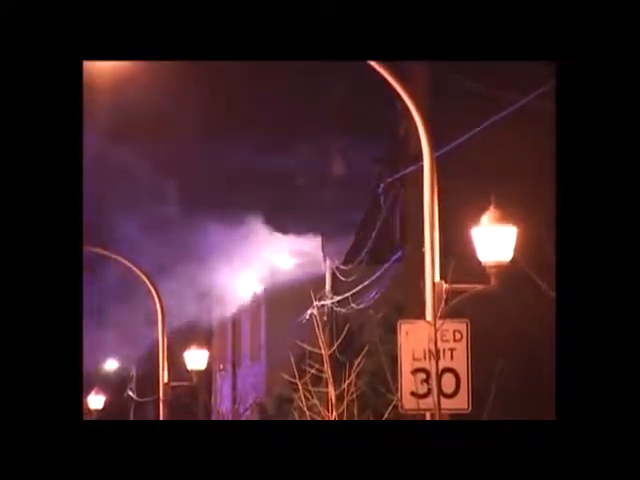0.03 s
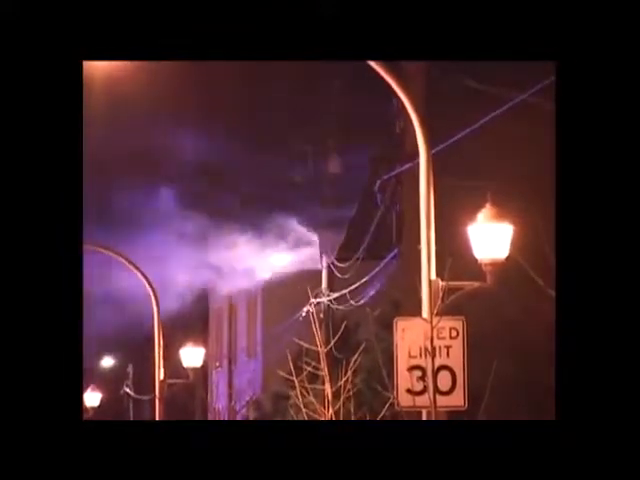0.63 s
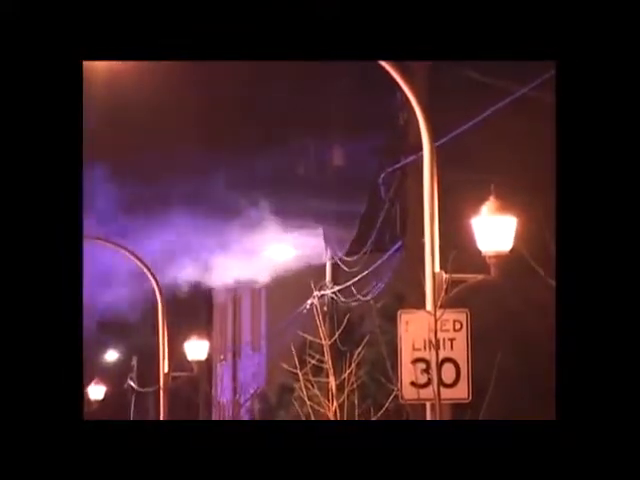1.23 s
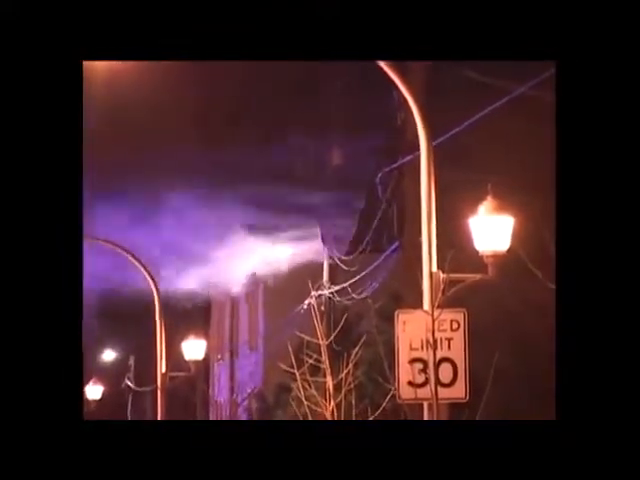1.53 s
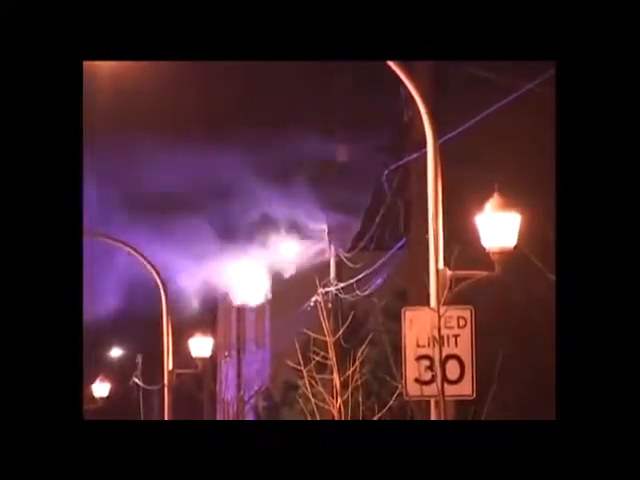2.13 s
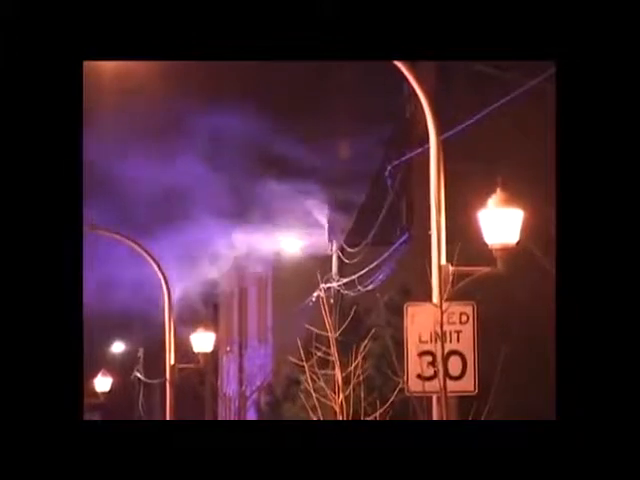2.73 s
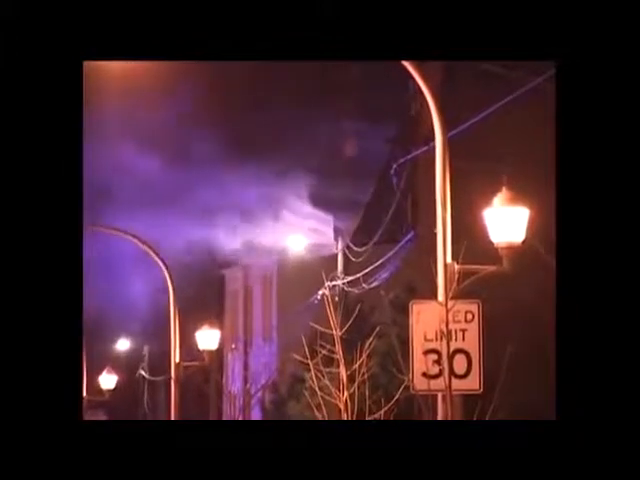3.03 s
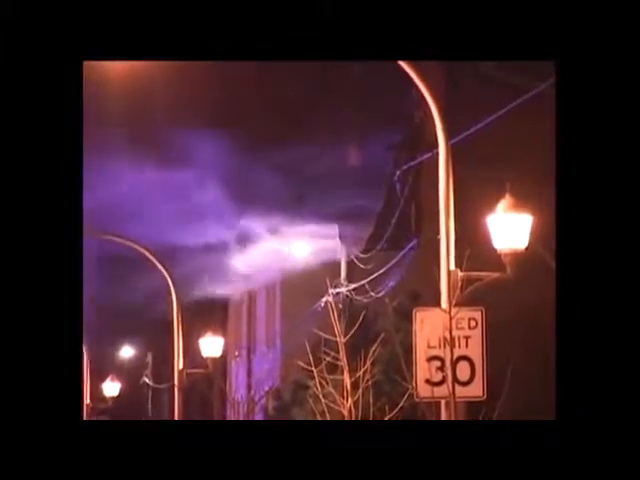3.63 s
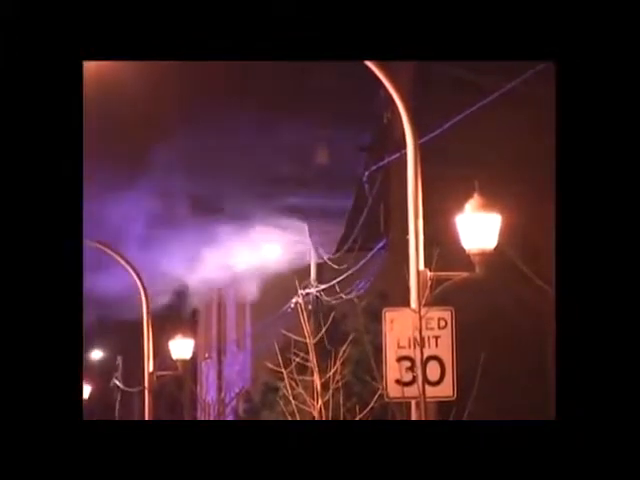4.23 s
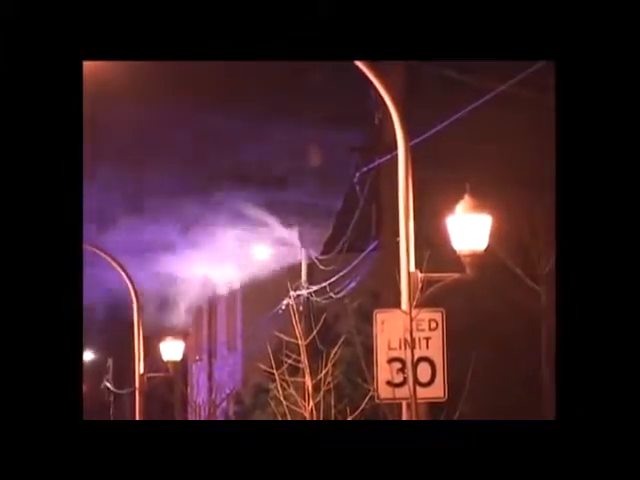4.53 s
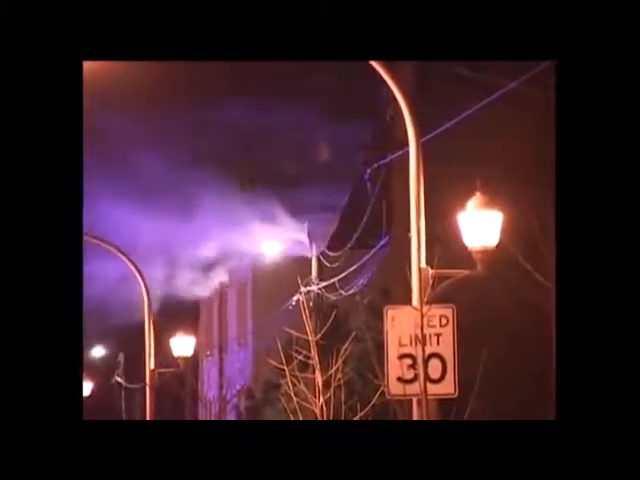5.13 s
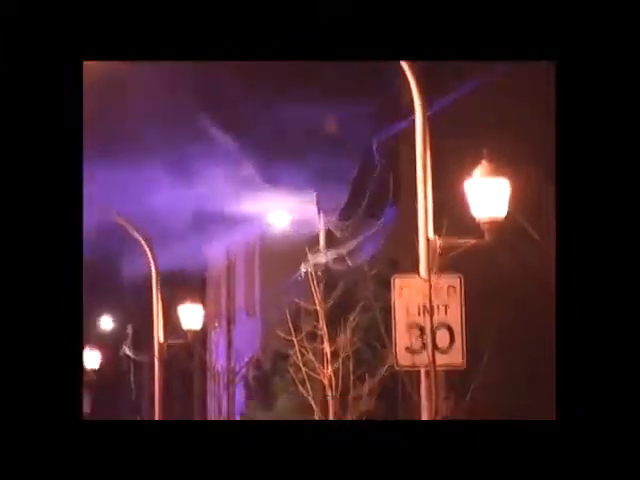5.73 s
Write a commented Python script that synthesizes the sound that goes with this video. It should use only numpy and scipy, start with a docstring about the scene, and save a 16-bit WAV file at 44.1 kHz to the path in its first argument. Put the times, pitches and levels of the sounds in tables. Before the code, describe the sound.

Gusty wind rumbles on the microphone over the continuous roar, thin hiss and small snaps of a distant electrical arc.

```python
"""A power line arcs at night, far down a windy street: steady roar and rasp, thin hiss.
Its sparks add a fine fizz and millisecond crackles. Short sizzles pass; a brief bright hiss comes last.
Wind eddies hit the microphone in single puffs, drop to a lull, then buffet it in long gusts.
In the lull a low hum swells, climbs in pitch and fades. One microphone feeds both channels."""
import sys
import numpy as np
from scipy import signal
from scipy.fft import rfft, irfft, next_fast_len
from scipy.io import wavfile
from scipy.ndimage import uniform_filter1d, map_coordinates

SR = 44100
rng = np.random.default_rng(int(sys.argv[2]) if len(sys.argv) > 2 else 0)


def put_to_file(sound):
    """Save the sound as 16-bit audio at rate SR, in the file named by the first command-line argument."""
    columns = np.atleast_2d(sound).T  # one column per channel
    safe = np.clip(columns, -1, 1)
    whole_steps = np.round(safe * 32767)
    wavfile.write(sys.argv[1], SR, whole_steps.astype(np.int16))


N = 264600

# arc envelopes, before layer offsets: (time [s], strength [dB], rasp [dB])
ARC_LEVELS = [(0.0, -42, -42), (0.22, -41, -38), (0.9, -42, -44), (2.2, -42, -42.5), (2.72, -42.5, -42),
              (3.15, -40.5, -41.5), (4.05, -40.5, -39.5), (4.9, -41, -42), (5.95, -42, -41.5)]
# loudest snaps: (time [s], level [dB], centre [Hz])
CRACKLE_EVENTS = [(0.4835, -36.5, 4730), (0.7713, -36, 6800), (.9522, -36, 5600), (1.1495, -35, 4600),
                  (1.6747, -30, 4430), (1.8551, -37, 5000), (2.491, -36, 3900), (2.598, -38, 4900),
                  (2.8414, -37, 6500), (3.4591, -34, 3600), (4.1812, -31, 5000), (4.421, -32, 4100),
                  (4.4778, -36, 6000), (4.702, -30, 3400), (4.8336, -35, 6300), (4.862, -26.5, 3600),
                  (5.127, -30.5, 4200)]
# short sizzles, then a brief bright hiss at the very end: (time [s], level [dB], half length [s])
SIZZLE_EVENTS = [(1.753, -43, 0.01), (1.779, -43, 0.012), (3.487, -53.5, 0.019), (4.204, -43, 0.008),
                 (4.873, -51, 0.03), (5.655, -52, 0.012), (5.983, -43.5, 0.013)]
# noise spectra: (frequency [Hz], relative density [dB])
ROAR_SPECTRUM = [(15, -45), (40, -27), (90, -20), (200, -1.5), (350, -7.5), (550, -6), (700, -4),
                 (880, -1.5), (1100, -6), (1600, -10.5), (2100, -16.5), (3200, -28.5), (5000, -37),
                 (12000, -59)]
RASP_SPECTRUM = [(600, -38), (1100, -2.5), (1450, -1), (1950, -4), (2600, -10.5), (3300, -22), (6000, -41),
                 (12000, -68)]
HISS_SPECTRUM = [(1500, -1.5), (3200, -1), (4400, 3.5), (6000, -1.5), (8000, -5.5), (10000, -8.5),
                 (12000, -19.5)]
FIZZ_SPECTRUM = [(1000, -37), (3000, 2.5), (4500, 2), (7500, -4), (12000, -13)]
SIZZLE_SPECTRUM = [(2000, -8), (4000, 5), (7500, 5), (9500, 0), (12000, -5.5)]
# wind at the microphone: (time [s], strength [dB])
WIND_LEVELS = [(0, -34.5), (0.25, -27), (0.72, -33.5), (1.02, -30.5), (1.25, -42), (1.66, -37), (2.1, -45),
               (2.73, -36.5), (2.83, -23.5), (2.94, -19.5), (3.01, -25.5), (3.22, -18), (3.45, -22.5),
               (3.63, -17), (3.92, -24.5), (4.06, -32), (4.25, -31), (4.36, -20.5), (4.57, -25),
               (4.87, -15.5), (5.07, -25), (5.6, -18.5), (5.73, -27.5), (5.8, -18.5), (5.93, -13.5),
               (5.99, -55)]
# small eddies: (time [s], level re wind strength [dB])
EDDY_LEVELS = [(0.3, -9), (3.2, -6.5), (4.3, -12.5), (5.1, -8.5), (5.9, -10.5)]
# lone eddies: (time [s], relative level [dB], pitch [Hz])
PUFF_EVENTS = [(0.212, -14.5, 122), (0.249, -19.5, 85.6), (0.4383, -8, 146), (0.505, -20.5, 173),
               (0.649, -15, 135), (.940, -19, 106), (1.590, -17.5, 100), (1.892, -28.5, 112),
               (3.785, -9.5, 99), (4.372, -17.5, 128), (4.876, -11.5, 150), (5.385, -14, 175),
               (5.539, -9, 149), (5.914, -7.5, 187), (5.959, -8.5, 180)]
# turbulence spectra: (frequency [Hz], relative density [dB])
BUFFET_SPECTRUM = [(8, -50), (22, -19), (38, -20), (55, -9.5), (80, 3), (130, 1.5), (190, -5.5), (260, -15),
                   (400, -30.5), (800, -70), (4000, -120)]
EDDY_SPECTRUM = [(20, -72), (90, -34), (170, -1.5), (235, 1), (310, -3), (420, -11), (650, -22),
                 (1200, -39.5), (3000, -42), (10000, -120)]
WAKE_SPECTRUM = [(40, -30), (150, -10), (240, -5.5), (380, -7.5), (520, -15), (800, -38), (3000, -80)]


def arc():
    """Arc roar and rasp arrive through gusty air; a thin hiss follows the roar."""
    strength_db, rasp_db = curves(ARC_LEVELS)
    roar = amp(strength_db + 3.5) * patchy(noise(ROAR_SPECTRUM), depth_db=0.2)
    rasp = amp(rasp_db - 2 + 1.1 * wobble(120)) * patchy(noise(RASP_SPECTRUM), depth_db=1.35)
    hiss = amp(strength_db - 13.5 + 0.31 * wobble(24.2)) * noise(HISS_SPECTRUM)
    return roar + rasp + hiss


def fizz():
    """Tiny sparks flare briefly, in clumps; their level follows the arc."""
    strength_db, _ = curves(ARC_LEVELS)
    rate_per_s, energy_decay_s = 170 * amp(2.2 * wobble(18)), 0.003
    fires = rng.random(N) < rate_per_s / SR
    sparks = fires * amp(np.minimum(5.3 * rng.exponential(size=N), 11))
    decay = np.exp(-np.arange(SR // 50) / SR / energy_decay_s)
    flare = np.sqrt(np.abs(signal.fftconvolve(sparks ** 2, decay)[:N]))
    bursts = coloured(flare * rng.standard_normal(N), FIZZ_SPECTRUM)
    return amp(strength_db - 14) * patchy(bursts, depth_db=2.0)


def crackles():
    """Millisecond snaps, each of its own colour, with weak scatter from the street."""
    attack_s, decay_s, scatter_s, width_oct = 0.0001, 0.0011, 0.009, 0.5
    out, t = np.zeros(N), np.arange(SR // 20) / SR
    hz = np.fft.rfftfreq(len(t), 1 / SR) + 1
    snap = (1 - np.exp(-t / attack_s)) * np.exp(-t / decay_s)
    scatter = 0.11 * np.exp(-t / scatter_s)
    highpass = 1 / np.sqrt(1 + (2800 / hz) ** 8)
    for s, db, centre_hz in CRACKLE_EVENTS + faint_crackles():
        band = np.exp(-0.5 * (np.log2(hz / centre_hz) / width_oct) ** 2)
        burst = unit(irfft(rfft(rng.standard_normal(len(t))) * band * highpass, len(t)))
        add(out, s, amp(db) * (snap + scatter) * burst)
    return out


def faint_crackles(rate_per_s=6, mean_db=-41, centre_hz=5440, spread_oct=0.23):
    """Weak random snaps: (time [s], level [dB], centre [Hz])."""
    times_s = np.flatnonzero(rng.random(N) < rate_per_s / SR) / SR
    drop_db, colour = rng.standard_normal((len(times_s), 2)).T
    return list(zip(times_s, mean_db - drop_db, centre_hz * 2 ** (spread_oct * colour)))


def sizzles():
    """Short swells of rough treble noise; the last is a brief bright hiss at the very end."""
    t = np.arange(N) / SR
    swell = sum(amp(db) * np.exp(-((t - s) / half_s) ** 2) for s, db, half_s in SIZZLE_EVENTS)
    roughness = amp(2.6 * wobble(700))
    return swell * unit(roughness * noise(SIZZLE_SPECTRUM))


def wind(breakaway_db=-33.5, steepness=2.6):
    """Large eddies rumble on the microphone; small ones break away and flutter in strong flow."""
    gust_db, = curves(WIND_LEVELS)
    share_db, = curves(EDDY_LEVELS)
    strength_db = gust_db + wobble(13)  # quick surges
    buffet = amp(strength_db + 0.1 + 1.7 * wobble(30)) * turbulence(BUFFET_SPECTRUM, span_s=0.0476)
    eddies = amp(strength_db + share_db + 3.25 * wobble(75)) * turbulence(EDDY_SPECTRUM, span_s=0.026)
    breakaway = 1 / (1 + amp(-steepness * (strength_db - breakaway_db)))
    return buffet + breakaway * eddies


def puffs(trail_db=-21, trail_peak_s=0.0094):
    """A lone eddy passes the microphone: push, pull, wake flutter, trailing rumble."""
    out, t = np.zeros(N), np.arange(N) / SR
    flutter = turbulence(WAKE_SPECTRUM, span_s=0.02)
    rumble = turbulence(BUFFET_SPECTRUM, span_s=0.023)
    for s, db, hz in PUFF_EVENTS:
        phase = 2 * np.pi * hz * (t - s)
        push_pull = -np.sin(phase) * np.exp(-(phase / 2.73) ** 2)
        # smaller eddy, stronger flutter
        wake = (hz / 400) ** 2 * flutter * np.exp(-((phase - 1.5) / 5.2) ** 2)
        age = np.maximum(t - s, 0) / trail_peak_s
        trail = amp(trail_db) * age * np.exp(1 - age) * rumble
        out += amp(db + 4.5) * (push_pull + wake + trail)
    return out


def hum():
    """Wavering low tone, perhaps a far engine: steady climb, slow swell, fast fade."""
    base_hz, climb_from_s, climb_hz_per_s = 114.2, 1.2, 11
    peak_s, peak_db, swell_db_per_s, fade_db_per_s = 2.47, -38.5, 6.5, 26
    t = np.arange(N) / SR
    hz = base_hz + climb_hz_per_s * np.maximum(t - climb_from_s, 0)
    db = peak_db - np.maximum(swell_db_per_s * (peak_s - t), fade_db_per_s * (t - peak_s))
    phase = 2 * np.pi * np.cumsum(hz * (1 + 0.0046 * wobble(11.4))) / SR
    return amp(db + 1.4 * wobble(8.04)) * np.sin(phase)


def amp(db):
    """Decibels to gain."""
    return 10 ** (np.asarray(db) / 20)


def unit(x):
    """x at rms 1."""
    return x / np.sqrt(np.mean(x ** 2) + 1e-20)


def curves(rows):
    """One per-sample curve for each column after the time."""
    times_s, *columns = np.transpose(rows)
    return [np.interp(np.arange(N) / SR, times_s, column) for column in columns]


def wobble(knots_per_s):
    """Smooth random curve, rms near 1."""
    knots = rng.standard_normal(int(N * knots_per_s / SR) + 4)
    return map_coordinates(knots, [np.arange(N) * knots_per_s / SR])


def filtered(x, response):
    """x filtered by the gain response(hz)."""
    size = next_fast_len(N + SR // 2)
    return irfft(rfft(x, size) * response(np.fft.rfftfreq(size, 1 / SR)), size)[:N]


def coloured(x, spectrum):
    """x shaped by a spectrum table on a log frequency axis, rms 1."""
    points_hz, db = np.transpose(spectrum)
    return unit(filtered(x, lambda hz: amp(np.interp(np.log(hz + 1), np.log(points_hz), db))))


def noise(spectrum):
    """Coloured noise, rms 1."""
    return coloured(rng.standard_normal(N), spectrum)


def patchy(x, depth_db):
    """x with random gain patches in time and frequency, rms 1."""
    bins = signal.stft(x, nperseg=512)[2]
    patches = uniform_filter1d(rng.standard_normal(bins.shape), size=6, axis=0)
    patches = uniform_filter1d(patches, size=16, axis=1)
    return unit(signal.istft(bins * amp(depth_db * unit(patches)), nperseg=512)[1][:N])


def turbulence(spectrum, span_s):
    """Noise, even in strength over span_s and lumpy within it."""
    x = noise(spectrum)
    power = np.abs(uniform_filter1d(x ** 2, int(span_s * SR) + 1))
    return unit(x / np.sqrt(power + 1e-6))


def add(track, start_s, x):
    """Mix x into track from start_s."""
    part = track[max(round(start_s * SR), 0):][:len(x)]
    part += x[:len(part)]


def scene():
    """All sources at one microphone, on two channels."""
    mono = arc() + fizz() + crackles() + sizzles() + hum() + wind() + puffs()
    return np.array([mono, mono])


def record(dry):
    """The strongest buffets saturate the microphone; a band limit cuts the top treble."""
    ceiling, cutoff_hz = 0.58, 12050
    saturated = dry / (1 + np.abs(dry / ceiling) ** 4) ** (1 / 4)
    return np.array([filtered(x, lambda hz: hz < cutoff_hz) for x in saturated])


dry = scene()
out = record(dry)
put_to_file(out)
```